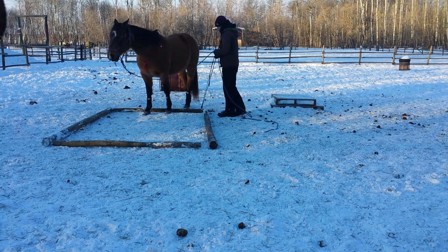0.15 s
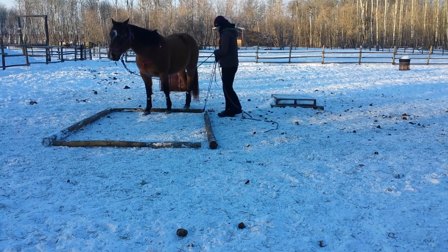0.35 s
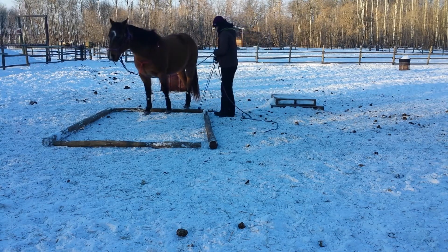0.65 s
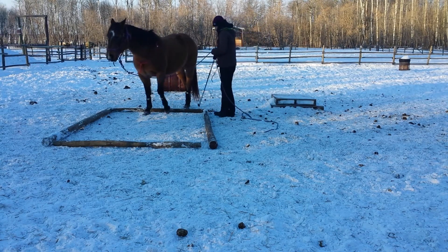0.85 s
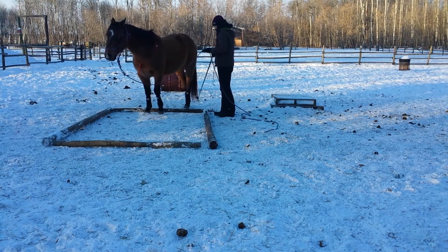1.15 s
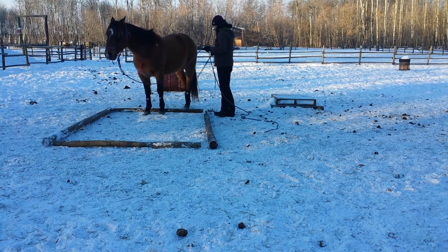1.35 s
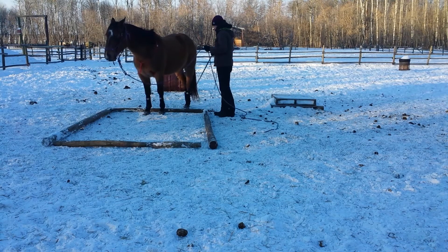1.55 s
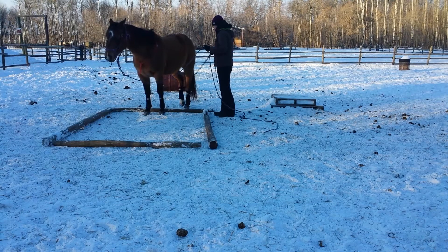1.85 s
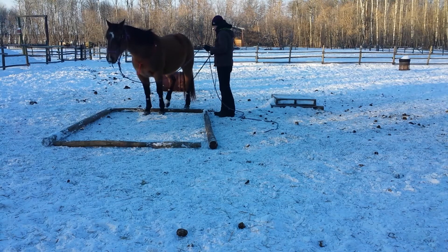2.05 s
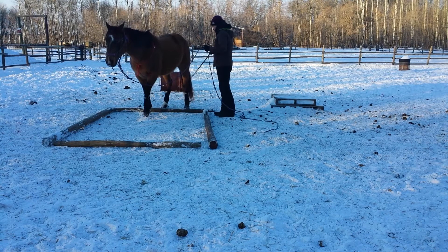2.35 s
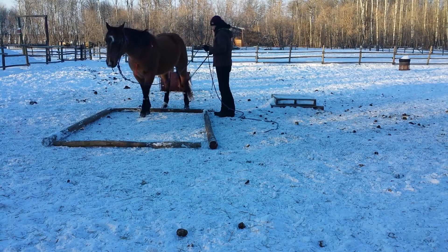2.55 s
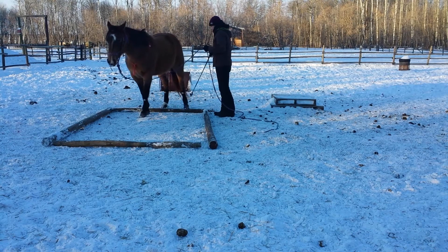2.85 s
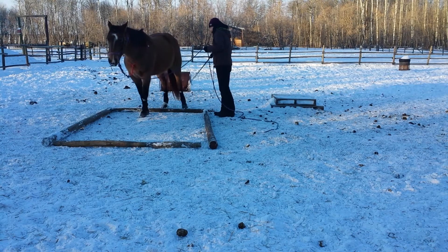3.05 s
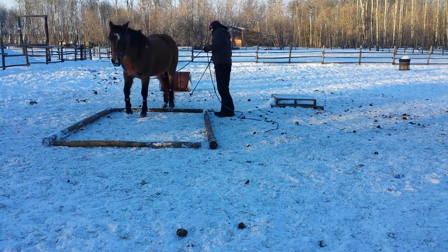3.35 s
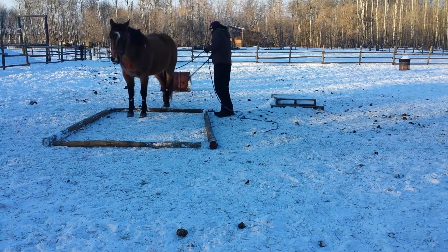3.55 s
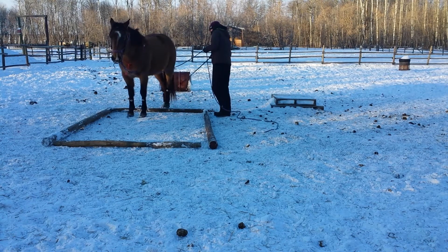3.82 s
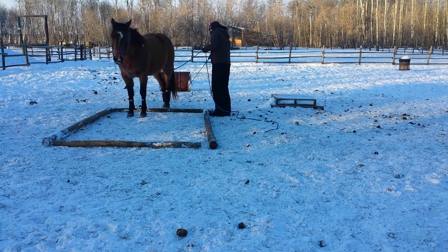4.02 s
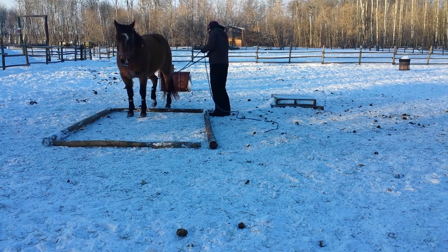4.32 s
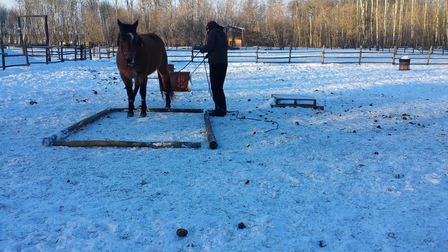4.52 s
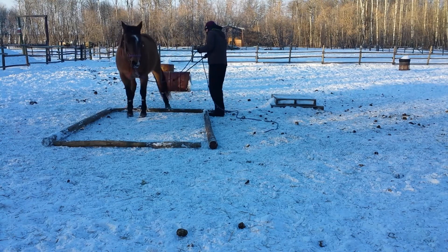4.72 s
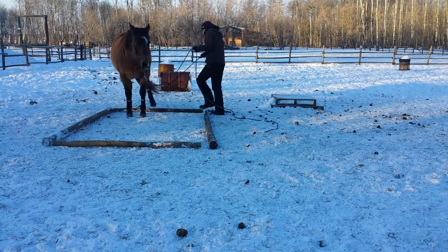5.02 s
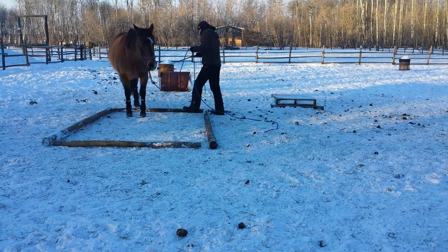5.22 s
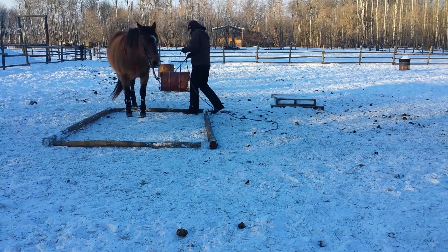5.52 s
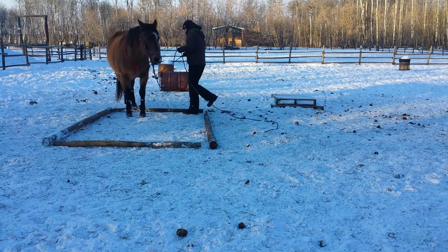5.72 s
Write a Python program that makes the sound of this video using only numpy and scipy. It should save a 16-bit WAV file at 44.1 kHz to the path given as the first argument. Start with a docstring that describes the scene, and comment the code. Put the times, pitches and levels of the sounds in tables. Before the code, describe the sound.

Slow, irregular hoof and boot steps crackle and creak in cold snow while light wind buffets the microphone.

```python
"""Hooves and boots in dry snow

Feet press into cold snow a few metres from a small two-port recorder. Under load the crystals
fracture in a dense bright crackle and the pack creaks lower down; crust snaps in single bursts,
and pockets of packed snow ring under a dragging foot. A far bird pipes; light wind buffets
each port on its own; the recorder hisses and whines faintly."""
import sys
import numpy as np
from scipy import signal
from scipy.fft import rfft, irfft
from scipy.io import wavfile
from scipy.ndimage import uniform_filter1d

SR = 44100
rng = np.random.default_rng(int(sys.argv[2]) if len(sys.argv) > 2 else 0)


def wav_record(signal):
    """Record a signal, one row per channel, as 16-bit PCM in the file named by sys.argv[1]."""
    frames = np.transpose(np.atleast_2d(signal))
    bounded = np.clip(frames, -1, 1)
    # unit amplitude maps onto the largest positive 16-bit level
    quanta = np.round(bounded * 32767).astype(np.int16)
    wavfile.write(sys.argv[1], SR, quanta)


N = 259308
CONTROL_STEP = 32   # samples

# Each row: contact, full load and lift in seconds, drop from full load at contact and at lift in dB,
# relative crackle, creak and grind levels in dB, brightest pitch in Hz.
FOOT_PRESSES = [(0.414, 0.423, 0.46, 5, 8, -58, -51, -63, 7800),
                (0.498, 0.541, 0.71, 10.5, -1.5, -59.5, -59, -62.5, 6840),
                (0.717, 0.806, 0.86, 8, 12, -49, -44, -51.5, 6670),
                (0.868, 0.95, 1.05, 4, 5, -56, -57.5, -61, 6400),
                (1.007, 1.025, 1.05, 14, 3, -51, -47.5, -61, 6450),
                (1.068, 1.306, 1.443, 11.5, 1, -49.5, -48.5, -56, 6200),
                (1.483, 1.486, 1.58, -4, 13, -56, -56, -60, 6060),
                (1.978, 2.08, 2.12, 4, -2, -59.5, -56.5, -63.5, 6400),
                (2.124, 2.167, 2.204, 5, 6.5, -51, -45.5, -56.5, 6450),
                (2.247, 2.338, 2.47, 8.5, 2, -54.5, -52, -57, 6350),
                (2.51, 2.712, 2.947, 11.5, 11.5, -46.5, -49, -49, 6100),
                (2.828, 2.847, 3.2, 9, 7.5, -45.5, -55.5, -54, 6200),
                (3.008, 3.125, 3.155, 4, -1, -56, -53, -53, 6900),
                (3.187, 3.246, 3.3, -2, -4.5, -64, -62, -63, 6540),
                (3.308, 3.338, 3.39, 3.5, 4.5, -55, -51.5, -55, 6700),
                (3.42, 3.501, 3.57, 7, 5, -54, -51, -59.5, 6850),
                (3.583, 3.608, 3.685, 7, 12.5, -54, -51, -55.5, 6800),
                (3.681, 3.753, 4.05, 8, 23, -66.5, -61.5, -72, 6760),
                (4.038, 4.066, 4.08, 8, 8, -57, -48.5, -59.5, 6200),
                (4.094, 4.194, 4.33, 10.5, 4, -53, -51.5, -54.5, 6100),
                (4.359, 4.368, 4.355, 7, 1.5, -46, -45.5, -43, 6800),
                (4.534, 4.764, 4.83, 7, 3.5, -52.5, -50.5, -54, 7000),
                (4.856, 4.988, 5.07, 10, 14.5, -49.5, -61, -54, 8600),
                (5.097, 5.164, 5.34, 8, 14, -53.5, -64, -57.5, 7600),
                (5.339, 5.394, 5.42, 14.5, 3, -59.5, -47, -58.5, 6900),
                (5.444, 5.47, 5.54, 2, 2, -59.5, -53, -60, 7140),
                (5.601, 5.755, 5.79, 8, 12, -50, -48, -55, 7540),
                (5.846, 5.888, 5.7, 7, -1.5, -56, -62, -67, 7220)]
# Resonances of the trodden snow. Each row: centre in Hz, width in Hz, gain in dB.
SNOW_HOLLOWS = [(798, 240, 4.5), (1175, 95, 4), (2350, 130, 5.5), (5940, 180, 3.5)]


def footsteps():
    """Snow fractures under each foot; a wide footprint gives each port some sound of its own."""
    load, columns = press_gains(FOOT_PRESSES), np.transpose(FOOT_PRESSES)
    crackle_db, creak_db, grind_db = (summed_db(load, db) for db in columns[5:8])
    brightest_hz = np.repeat(columns[8][np.argmax(load, axis=0)], CONTROL_STEP)[:N]
    clumping = np.clip((-49 - crackle_db) / 11.5, .15, 1)   # light presses are more uneven
    slips_db = 2.5 * clumping * drift(36)
    common_crackle, *side_crackles = crackle(crackle_db - 2.5 + slips_db, brightest_hz)
    underfoot = creak(creak_db, slips_db) + grind(grind_db + slips_db) + common_crackle
    shared = resonances(underfoot, SNOW_HOLLOWS) + crust_knocks() + groan() + pockets()
    sides = []
    for side_crackle in side_crackles:
        side_grind = from_db(grind_db - 5.5) * ringing_grains(1800, 920, 3760, t60_cycles=4.5)
        sides.append(from_db(2.5) * (side_crackle + side_grind))
    return housing(shared, sides)


def press_gains(rows, contact_s=.018, lift_s=.013, trail_s=.12):
    """One gain curve a press: quick contact, loading, easing, quick lift, trailing crumbs."""
    t, gains = np.arange(0, N, CONTROL_STEP) / SR, []
    for contact, full, lift, contact_db, lift_db, *_ in rows:
        halfway = (contact + full) / 2
        times = np.sort([contact - contact_s, contact, halfway, full, lift, lift + lift_s, lift + trail_s])
        drop_db = [contact_db + 35.5, contact_db, .4 * contact_db, 0,
                   lift_db, lift_db + 15.5, lift_db + 35.5]
        gains.append(from_db(-np.interp(t, times, drop_db, left=120, right=120)))
    return np.array(gains)


# Each row: frequency in Hz, relative density in dB.
CRYSTAL_SPECTRUM = [(2500, -7.5), (4000, -2), (6500, -8.5), (9000, -3.5), (12000, -4), (15000, -16)]
# Each entry: band edge in Hz.
CRACKLE_EDGES_HZ = [2000, 4200, 5500, 6800, 8300, 10500, 16000]


def crackle(level_db, brightest_hz):
    """Crystals of each size break in their own clumps. Three streams: common, left, right."""
    sparkle = .64 * ringing_grains(2000, 3680, 11640, t60_cycles=40)
    streams = np.array([coloured(grains(9000, 3.6), CRYSTAL_SPECTRUM) for _ in range(3)])
    streams[0] += sparkle
    out = 0
    for low, high in zip(CRACKLE_EDGES_HZ, CRACKLE_EDGES_HZ[1:]):
        hz = np.sqrt(low * high)
        clumps_db = emphasis_db(hz, brightest_hz, 2.45) + 1.5 * drift(27) + 1.1 * drift(280)
        band = signal.sosfilt(signal.butter(2, [low, high], "band", fs=SR, output="sos"), streams)
        out = out + (from_db(level_db + clumps_db) + snap_envelope(hz, brightest_hz)) * band
    return out


# Each row: time in seconds, relative level in dB, t60 in seconds.
CRYSTAL_SNAPS = [(0.4199, -57, 0.026), (0.6075, -48, 0.031), (0.644, -41.5, 0.039), (0.6978, -44, 0.028),
                 (0.911, -36, 0.035), (1.0281, -37, 0.022), (1.426, -34.5, 0.049), (1.487, -39.5, 0.035),
                 (1.6412, -45, 0.03), (1.913, -35, 0.035), (2.0258, -41, 0.025), (2.0415, -40.5, 0.029),
                 (2.1121, -39, 0.021), (2.1345, -44, 0.049), (2.3047, -47, 0.032), (2.3226, -31.5, 0.035),
                 (2.346, -31.5, 0.033), (2.396, -42, 0.032), (2.444, -38.5, 0.035), (2.4658, -37, 0.048),
                 (2.5865, -37.5, 0.035), (2.616, -35.5, 0.04), (2.6828, -43, 0.043), (2.7591, -33, 0.037),
                 (2.823, -30, 0.035), (2.8404, -34, 0.027), (3.04, -33, 0.028), (3.1413, -28.5, 0.028),
                 (3.2034, -33, 0.03), (3.3099, -36.5, 0.03), (4.131, -38.5, 0.028), (4.307, -38, 0.045),
                 (4.35, -47, 0.031), (4.3665, -30, 0.038), (4.5306, -46, 0.032), (4.5855, -35, 0.04),
                 (4.6145, -33, 0.029), (4.6488, -36, 0.035), (4.6808, -34, 0.035), (4.7128, -34.5, 0.03),
                 (4.7464, -39, 0.047), (4.789, -32, 0.028), (4.8214, -33.5, 0.042), (4.8698, -38, 0.035),
                 (4.8868, -33, 0.033), (4.9152, -31, 0.027), (4.9496, -30.5, 0.056), (5.021, -40, 0.025),
                 (5.1128, -51, 0.035), (5.1307, -58, 0.032), (5.1452, -40, 0.035), (5.1617, -32, 0.059),
                 (5.2076, -36.5, 0.027), (5.262, -37, 0.023), (5.5298, -43, 0.025), (5.64, -36.5, 0.035),
                 (5.7239, -38, 0.047), (5.7583, -32, 0.045), (5.8047, -51, 0.035), (5.831, -46, 0.038)]


def snap_envelope(band_hz, brightest_hz):
    """Crystals shear in single puffs: one band's gain swells and dies with each."""
    out = np.zeros(N)
    top_loss_db = 2 * (band_hz > 10000)
    for at_s, level_db, t60 in CRYSTAL_SNAPS:
        start = round((at_s - .003) * SR)
        t = np.arange(min(int(.12 * SR), N - start)) / SR
        swell = np.sin(np.pi / 2 * np.minimum(t / (.31 * t60), 1)) ** 2
        band_db = level_db - top_loss_db + emphasis_db(band_hz, brightest_hz[start], 4)
        out[start:][:len(t)] += from_db(band_db - 60 * t / t60) * swell
    return out


# Each row: frequency in Hz, relative density in dB.
PACK_SPECTRUM = [(120, -12.5), (250, -1.5), (450, 1), (800, -1), (1200, -11.5), (2000, -45.5)]


def creak(level_db, slips_db):
    """The pack gives in low ticks, denser under more load."""
    ticks_per_s = 300 + 500 * from_db(.9 * (level_db + 50.5))
    return from_db(level_db - 1.5 + slips_db) * coloured(grains(ticks_per_s, 2.55), PACK_SPECTRUM)


def grind(level_db):
    """Midrange fractures ring at a flickering level."""
    flicker_db = 2.6 * drift(70)
    return from_db(level_db - 2.5 + flicker_db) * ringing_grains(900, 1077, 3760, t60_cycles=19.7)


# Each row: start in seconds, relative thud level in dB, thud pitch in Hz, ring against tick in dB,
# relative crack level in dB, crack pitch in Hz.
CRUST_KNOCKS = [(0.016, -49, 700, -7, -68, 2400), (0.076, -48, 390, -14, -71, 2660),
                (0.28, -52.5, 420, -8, -74, 2080), (0.42, -32, 885, -7.5, -45.5, 1890),
                (0.479, -43.5, 824, -8, -63, 2430), (0.522, -41, 813, -8, -56, 2510),
                (0.542, -37, 479, -10, -49, 2000), (0.547, -31, 810, -9, -43, 1880),
                (0.554, -33.5, 564, -11, -51, 2510), (0.582, -31.5, 537, -12, -54, 2520),
                (0.606, -33.5, 620, -13, -56, 2500), (0.625, -37, 590, -10, -45.5, 2470),
                (0.642, -42, 580, -9, -58, 2350), (0.654, -36.5, 596, -10, -54, 2350),
                (0.681, -36, 560, -9, -47, 1770), (0.697, -31, 625, -10, -54, 1730),
                (0.716, -35.5, 550, -9, -55, 2520), (0.73, -33, 686, -10, -53, 2380),
                (0.738, -39, 510, -8, -52, 2340), (0.781, -36.5, 605, -7, -43, 2500),
                (0.893, -35.5, 584, -7, -52, 2550), (0.912, -28.5, 760, -10, -33.5, 2930),
                (0.944, -38, 654, -7, -48.5, 2300), (1.028, -24.5, 745, -6.5, -33.5, 2880),
                (1.062, -37, 560, -5, -62, 2690), (1.259, -40, 630, -10, -62, 3000),
                (1.321, -34.5, 685, -6, -49, 2900), (1.354, -35, 775, -4, -60, 2350),
                (1.491, -40, 756, -7, -46, 2270), (1.509, -45, 654, -6, -56, 2280),
                (1.852, -45.5, 479, -12, -58, 2240), (1.909, -38.5, 563, -9, -41.5, 2250),
                (1.982, -45, 790, -8, -60, 1660), (2.025, -37.5, 711, -6, -49.5, 3020),
                (2.042, -33, 759, -8, -55, 2540), (2.065, -58, 460, -8, -51, 2570),
                (2.093, -53, 776, -5, -51, 2230), (2.111, -30.5, 720, -7, -54.5, 1870),
                (2.135, -41, 751, -8, -50, 2230), (2.15, -31, 414, -11, -52, 2530),
                (2.161, -32, 620, -8, -56, 2360), (2.248, -46.5, 437, -6, -61, 2450),
                (2.32, -38, 622, -8, -42, 2330), (2.346, -36, 428, -6, -38.5, 2770),
                (2.395, -38, 910, -5, -49, 2800), (2.419, -41, 557, -8, -58, 2260),
                (2.444, -37, 620, -9, -48, 2760), (2.464, -45, 665, -11, -40, 3030),
                (2.559, -44, 750, -8, -46, 2670), (2.583, -44, 623, -5, -47, 1880),
                (2.707, -44, 590, -8, -54, 2820), (2.757, -41, 674, -2, -44, 2210),
                (2.806, -35, 750, -10, -47.5, 2480), (2.839, -40, 735, -4, -42.5, 1840),
                (2.913, -29, 533, -8, -40.5, 2200), (2.986, -40, 888, -5, -53, 2560),
                (3.008, -35, 842, -10, -58, 2380), (3.022, -35, 724, -11, -60, 2330),
                (3.038, -27.5, 673, -5.5, -48, 2290), (3.14, -32, 676, -11, -44, 2400),
                (3.146, -26, 587, -7.5, -34.5, 2290), (3.202, -27.5, 487, -9.5, -47, 2300),
                (3.249, -45, 415, -8, -60, 2800), (3.263, -45.5, 417, -9, -57, 2496),
                (3.308, -31, 590, -7, -42.5, 2380), (3.459, -39.5, 750, -8, -67, 1690),
                (3.493, -51, 727, -8, -63, 3080), (3.518, -40, 754, -6, -54, 1910),
                (3.553, -44, 750.5, -3, -50, 2230), (3.566, -54, 740, -15, -54, 1990),
                (3.58, -56, 860, -8, -44.5, 1710), (3.607, -33, 786, -5.5, -44, 1900),
                (3.623, -39, 864, -6, -47.5, 2680), (3.841, -41.5, 413, -7, -57.5, 2460),
                (3.906, -48, 430, -7, -59, 2385), (4.056, -46, 493, -8, -63, 1839),
                (4.13, -37, 450, -5, -41, 1960), (4.172, -46, 550, -8, -56, 2230),
                (4.349, -33, 554, -8, -45, 2560), (4.408, -37.5, 516, -5, -56, 2520),
                (4.531, -48, 791, -4, -67, 2470), (4.699, -36, 786, -5.5, -50, 2580),
                (4.759, -39, 635, -8, -47.5, 2750), (4.795, -34, 750, -9, -48, 2740),
                (4.869, -30.5, 507, -10.5, -39, 1960), (4.915, -35.5, 840, -7, -51, 2400),
                (4.961, -34.5, 910, -7.5, -53, 2770), (4.999, -57, 590, -8, -60, 2200),
                (5.021, -47, 686, -8, -47.5, 2040), (5.11, -41.5, 934, -7, -48, 1610),
                (5.128, -44, 982, -4, -49, 1620), (5.145, -46, 570, -7, -47, 1870),
                (5.156, -45, 622, -8, -45.5, 2610), (5.176, -44, 966, -8, -48, 2500),
                (5.193, -60, 420, -8, -55, 2510), (5.206, -62, 549, -10, -49.5, 1860),
                (5.225, -61, 538, -11, -53, 2880), (5.261, -36.5, 560, -8, -46.5, 2540),
                (5.456, -44, 762, -8, -69, 2720), (5.52, -34.5, 850, -6, -50, 2040),
                (5.635, -37.5, 530, -10, -45.5, 2630), (5.797, -39.5, 463, -8, -65, 2860),
                (5.827, -37, 490, -6.5, -66, 2260), (5.866, -36.5, 401, -9, -56, 1830)]


def crust_knocks(tick_t60_cycles=2.75, ring_t60_cycles=11):
    """Crust breaks with a rough crack and a dull tick; the pack rings on after it."""
    out, length = np.zeros(N), int(.05 * SR)
    for start_s, thud_db, thud_hz, ring_db, crack_db, crack_hz in CRUST_KNOCKS:
        start = round(start_s * SR)
        t = np.arange(min(length, N - start)) / SR
        thud_t = np.maximum(t - .0014, 0)
        cycles = thud_hz * thud_t
        rise = 1 - np.exp(-thud_t / .00033)
        decay = from_db(-60 * cycles / tick_t60_cycles) + from_db(ring_db - 60 * cycles / ring_t60_cycles)
        thud = from_db(thud_db + 6) * rise * decay * np.sin(2 * np.pi * cycles)
        burst = from_db(crack_db - 10 - 60 * t / .035) * np.minimum(t / .0028, 1)
        splinters = burst * rng.standard_normal(length)[:len(t)]
        crack = ring(splinters, crack_hz, .0045)
        crack += 1.5 * ring(splinters, 1460, .0032) + .81 * ring(splinters, 3160, .0024)
        out[start:][:len(t)] += thud + crack
    return out


# Each row: contact, full load and lift in seconds, drop at contact and at lift in dB, level in dB.
DEEP_PRESSES = [(4.142, 4.15, 4.4, 17, 1.5, -45.5), (4.532, 4.788, 4.9, 3, -3.5, -53.5)]


def groan():
    """The horse's weight compacts deep snow in sparse, low fractures."""
    level_db = summed_db(press_gains(DEEP_PRESSES), np.array(DEEP_PRESSES)[:, 5])
    return from_db(level_db) * ringing_grains(374, 135, 460, t60_cycles=3.6)


# Each row: middle in seconds, length in seconds, level in dB, pitch in Hz.
SNOW_POCKETS = [(0.77, .12, -48.5, 1260), (1.3, 0.3, -52.5, 770), (1.26, 0.33, -51.5, 1160),
                (1.37, 0.21, -57.5, 2320), (1.327, 0.23, -58.5, 5900), (1.26, 0.15, -58, 7800),
                (2.02, .1, -53.5, 1220), (2.68, .22, -58, 2750), (2.618, 0.18, -58, 1940),
                (2.9, 0.15, -57, 2230), (3.095, 0.13, -46.5, 850), (3.54, 0.26, -59.5, 760),
                (3.6, 0.069, -55.5, 1800), (4.267, 0.15, -60.5, 2280), (4.785, 0.18, -56.5, 794),
                (4.81, 0.093, -63, 2750), (4.982, .1, -56, 1100), (5.18, 0.11, -57.5, 1800),
                (5.718, 0.25, -66, 2240)]


def pockets(t60_cycles=29):
    """Fractures under a dragging foot ring one narrow resonance in each pocket of packed snow."""
    out, clicks = np.zeros(N), grains(1200, 3.4)
    for hump, (middle_s, length_s, db, hz) in zip(humps(SNOW_POCKETS), SNOW_POCKETS):
        span = slice(round((middle_s - length_s / 2) * SR), round((middle_s + length_s / 2) * SR))
        swell = np.repeat(hump, CONTROL_STEP)[span] ** .5
        out[span] += from_db(db) * swell * rms_one(ring(clicks[span], hz, t60_cycles / hz))
    return out


# Each row: centre in Hz, width in Hz, gain in dB.
LEFT_PORT_MODES = [(1293, 970, -10), (2200, 2870, 9.5), (3360, 920, -12), (5610, 790, 9), (6900, 1400, 14),
                   (13100, 2060, -19)]
RIGHT_PORT_MODES = [(1640, 350, -8), (3370, 200, -2.5), (4370, 890, 7.5), (6200, 490, 9.5),
                    (7470, 1790, 9.5), (9800, 4900, 2), (11820, 340, -15)]


def housing(shared, sides, right_lag_s=.00009):
    """The housing resonates and shadows each port; shared sound reaches the right one later."""
    hz, channels = np.fft.rfftfreq(N, 1 / SR), []
    for own, lag_s, modes in zip(sides, (0, right_lag_s), (LEFT_PORT_MODES, RIGHT_PORT_MODES)):
        delayed = irfft(rfft(shared) * np.exp(-2j * np.pi * hz * lag_s), N)
        channels.append(resonances(delayed + own, modes))
    return np.array(channels)


# Each row: frequency in Hz, relative density in dB.
EDDY_SPECTRUM = [(12, -43), (20, -20.5), (48, 3), (107, 1), (198, -12), (302, -26.5), (347, -28.5),
                 (389, -32), (420, -60), (550, -71), (920, -120)]


def wind():
    """Eddies buffet each port separately; their own swings are partly evened so the gusts lead."""
    eddies = np.array([coloured(rng.standard_normal(N) * from_db(5.3 * drift(33)), EDDY_SPECTRUM)
                       for _ in range(2)])
    eddies /= uniform_filter1d(rms_one(eddies) ** 2, size=3000) ** .35 + .05
    port_db = wind_level_db()
    deep = signal.sosfilt(signal.butter(1, 60, fs=SR, output="sos"), eddies)
    thinning = np.clip((port_db + 59) / 40, 0, .8)   # stronger gusts shed smaller, quicker eddies
    return from_db(port_db) * rms_one(eddies - thinning * deep)


# Each row: time in seconds, level in dB.
BREEZE_CURVE = [(0.0, -53.5), (0.64, -58), (1.05, -51), (1.41, -60), (1.75, -59.5), (2.01, -49),
                (2.41, -50.5), (2.93, -47.5), (3.32, -54.5), (4.08, -58), (4.21, -60), (4.58, -53.5),
                (4.77, -51.5), (5.27, -55.5), (5.44, -47.5), (5.88, -65)]
# Each row: middle in seconds, length in seconds, peak in dB, left minus right in dB.
WIND_GUSTS = [(0.376, .1, -49.5, 9), (0.595, 0.061, -48, 20.5), (0.695, 0.06, -48, 8),
              (0.885, .12, -37.5, 31.5), (0.953, 0.047, -36.5, 18), (1.053, 0.17, -31, 4.5),
              (1.222, 0.079, -48, 26.5), (1.299, .04, -47, 19), (1.374, 0.042, -47.5, 21.5),
              (1.84, 0.11, -46, 15), (1.966, 0.24, -47, 14.5), (2.145, 0.21, -35.5, 5.5),
              (2.449, 0.048, -43, 22), (2.565, 0.063, -46, -20), (2.717, 0.037, -39, -10),
              (2.878, 0.095, -34.5, 9), (2.94, 0.17, -41, 2), (3.068, 0.046, -35.5, 3),
              (3.213, 0.051, -42, 8), (3.348, 0.073, -50, 13), (3.641, .14, -43.5, 28),
              (4.175, 0.31, -45, 11.5), (4.974, 0.061, -43, 4), (5.386, 0.075, -39.5, 1),
              (5.51, .14, -41, 11), (5.613, 0.1, -42, -4), (5.762, 0.054, -43.5, 0),
              (5.87, 0.13, -40.5, -3)]


def wind_level_db(breeze_lean_db=5, lumps_db=3):
    """Level at each port: a lumpy breeze leaning left, plus rounded gusts with their own lean."""
    breeze_db = np.interp(np.arange(N) / SR, *np.transpose(BREEZE_CURVE))
    peak_db, lean_db = np.array(WIND_GUSTS)[:, 2:].T
    levels_db = []
    for side in (.5, -.5):
        breeze = from_db(breeze_db + side * breeze_lean_db + lumps_db * drift(6.5))
        gusts = from_db(summed_db(humps(WIND_GUSTS), peak_db + side * lean_db))
        levels_db.append(10 * np.log10(breeze ** 2 + gusts ** 2))
    return np.array(levels_db)


# Each row: middle in seconds, length in seconds, level in dB.
BIRD_NOTES = [(.5, .035, -64), (.57, .06, -65), (.67, .045, -64), (.77, .035, -62), (.845, .03, -64),
              (.93, .03, -65), (.985, .03, -64), (1.06, .025, -65), (5.61, .03, -68), (5.68, .06, -65),
              (5.84, .04, -64)]


def bird(pitch_hz=4690):
    """Short far whistles on one pitch, fluttering with the air on the way."""
    t = np.arange(N) / SR
    notes = sum(from_db(db) * arch(t, middle_s, length_s) for middle_s, length_s, db in BIRD_NOTES)
    flutter = from_db(2.5 * drift(60))
    return notes * flutter * np.sin(2 * np.pi * pitch_hz * t + .8 * drift(30))


# Each row: frequency in Hz, relative density in dB.
HISS_SPECTRUM = [(120, -41.5), (200, -0.5), (613, -7), (818, -9), (1460, -12), (3800, -15), (5070, -10),
                 (7150, -14.5), (8720, -10), (14000, -18), (15000, -32)]
# Each row: frequency in Hz, peak in dB.
WHINE_TONES = [(5001, -79), (10002, -84), (12500, -87)]


def electronics(hiss_db=-62):
    """Separate hiss in each channel and a thin, slightly unsteady whine in both."""
    hiss = np.array([coloured(rng.standard_normal(N), HISS_SPECTRUM) for _ in range(2)])
    t = np.arange(N) / SR
    whine = sum(from_db(db) * np.sin(2 * np.pi * hz * t + .7 * drift(3)) for hz, db in WHINE_TONES)
    return from_db(hiss_db) * hiss + whine


def grains(per_s, spread_db):
    """Random fractures, many small and a few large; rms 1 at any rate."""
    sizes = from_db(spread_db * np.minimum(rng.exponential(1, N), 5)) * rng.choice([-1, 1], N)
    return rms_one(sizes * (rng.random(N) < per_s / SR) / np.sqrt(per_s))


def ringing_grains(per_s, low_hz, high_hz, t60_cycles):
    """Each fracture rings briefly at a pitch set by the size of the broken piece."""
    clicks, size_class = grains(per_s, 1.04), rng.integers(0, 14, N)
    pitches = np.geomspace(low_hz, high_hz, 14)
    rings = (ring(clicks * (size_class == k), hz, t60_cycles / hz) for k, hz in enumerate(pitches))
    return rms_one(sum(rings))


def ring(clicks, hz, t60_s):
    """A unit click starts a decaying sine of height 1."""
    r, w = from_db(-60 / (t60_s * SR)), 2 * np.pi * hz / SR
    return signal.lfilter([0, np.sin(w)], [1, -2 * r * np.cos(w), r * r], clicks + 1e-18)


def resonances(x, modes):
    """A chain of peaks and dips."""
    for hz, width_hz, db in modes:
        tuning = -2 * np.cos(2 * np.pi * hz / SR)
        k, a = np.tan(np.pi * width_hz / SR), from_db(db / 2)
        x = signal.lfilter([1 + k * a, tuning, 1 - k * a], [1 + k / a, tuning, 1 - k / a], x)
    return x


def coloured(x, spectrum):
    """Minimum-phase filter with the given spectrum; white noise keeps its power."""
    hz, db = np.transpose(spectrum)
    grid_hz = np.maximum(np.fft.rfftfreq(8192, 1 / SR), 5)
    level_db = np.interp(np.log(grid_hz), np.log(hz), db, left=db[0] - 16.5, right=db[-1] - 30.5)
    cepstrum = irfft(np.log(from_db(level_db)))
    cepstrum[1:4096] *= 2   # fold onto positive time
    cepstrum[4097:] = 0
    response = irfft(np.exp(rfft(cepstrum)))
    return signal.fftconvolve(x, response / np.sqrt(np.sum(response ** 2)))[:N]


def emphasis_db(band_hz, brightest_hz, depth_db):
    """A spectral hump about the brightest pitch."""
    return depth_db * np.exp(-(np.log2(band_hz / brightest_hz) / .41) ** 2)


def arch(t, middle_s, length_s):
    """A parabola of height 1, zero outside its length."""
    return np.clip(1 - (2 * (t - middle_s) / length_s) ** 2, 0, 1)


def humps(rows):
    """One arch a row, at the control rate."""
    t = np.arange(0, N, CONTROL_STEP) / SR
    return np.array([arch(t, middle_s, length_s) for middle_s, length_s, *_ in rows])


def summed_db(gains, levels_db):
    """Overlapping events added as powers, one level a sample."""
    coarse_db = 10 * np.log10(from_db(levels_db) ** 2 @ gains ** 2 + 1e-14)
    return np.interp(np.arange(N) / CONTROL_STEP, np.arange(len(coarse_db)), coarse_db)


def drift(rate_hz):
    """Random wander of rms 1, smoothed above rate_hz."""
    step = 20
    r = np.exp(-2 * np.pi * rate_hz * step / SR)
    slow = signal.lfilter([1], [1, -2 * r, r * r], rng.standard_normal(N // step + 3002))[3000:]
    return np.interp(np.arange(N) / step, np.arange(len(slow)), rms_one(slow))


def from_db(db):
    """Gain of a level in dB."""
    return 10 ** (np.asarray(db) / 20)


def rms_one(x):
    """Each channel scaled to rms 1."""
    return x / np.sqrt(np.mean(x ** 2, axis=-1, keepdims=True) + 1e-20)


def scene():
    """Steps in snow, bird, wind and the recorder's own noise, in stereo."""
    return footsteps() + bird() + wind() + electronics()


def record(dry):
    """The recorder cuts the top steeply."""
    cutoff_hz = 14560
    return signal.sosfilt(signal.ellip(12, .5, 60, cutoff_hz, fs=SR, output="sos"), dry)


dry = scene()
out = record(dry)
wav_record(out)
```